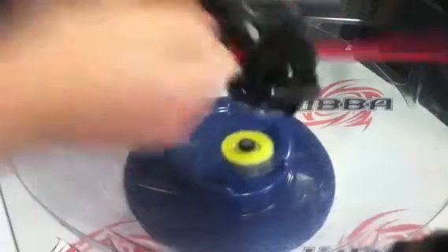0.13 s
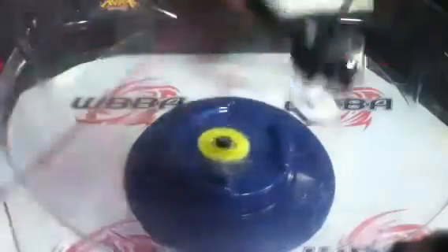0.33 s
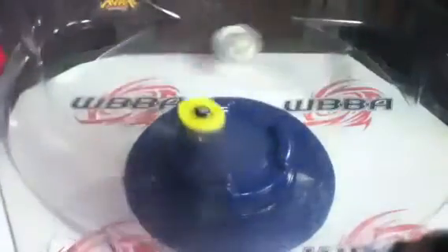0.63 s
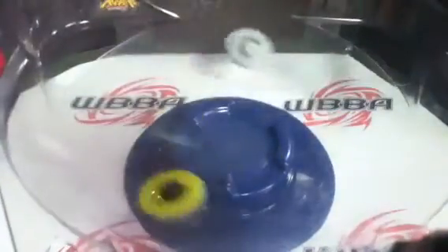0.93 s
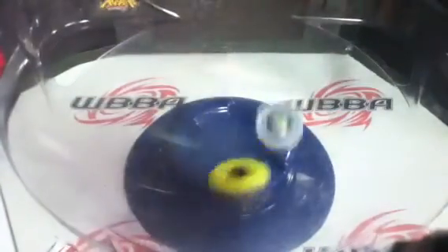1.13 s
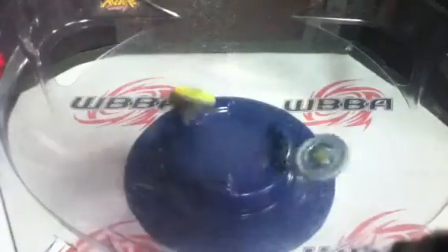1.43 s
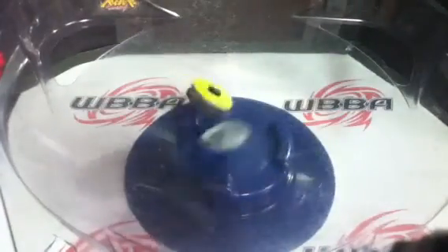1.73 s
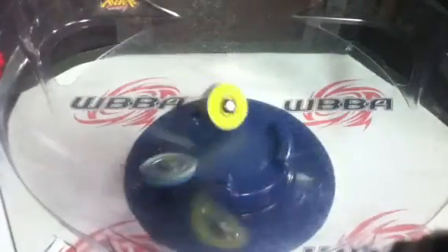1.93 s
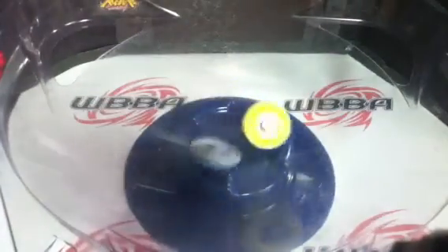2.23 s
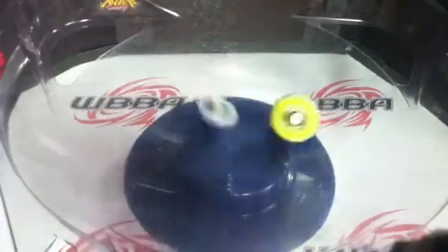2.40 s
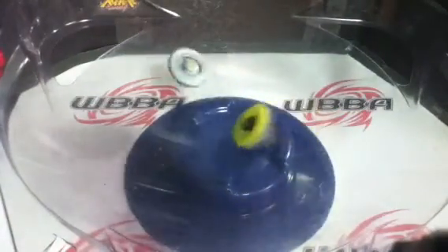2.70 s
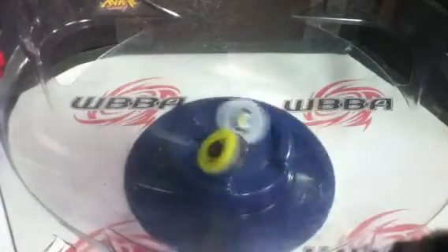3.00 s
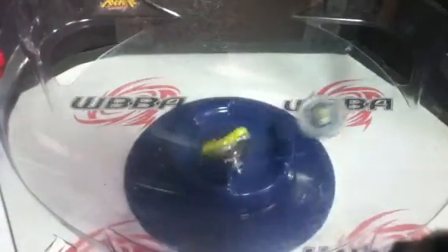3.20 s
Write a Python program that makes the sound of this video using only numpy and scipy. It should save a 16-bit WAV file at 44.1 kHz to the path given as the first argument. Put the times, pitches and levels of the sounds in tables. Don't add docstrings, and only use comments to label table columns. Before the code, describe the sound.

Metal spinning tops clash with bright cracks, then scrape and tick rapidly around a plastic bowl.

```python
import sys
import numpy as np
from scipy import signal
from scipy.fft import rfft, irfft
from scipy.io import wavfile
from scipy.ndimage import uniform_filter1d

SR = 44100
rng = np.random.default_rng(int(sys.argv[2]) if len(sys.argv) > 2 else 0)


def pcm_store(signal):
    levels = np.round(np.clip(np.atleast_2d(signal), -1, 1) * 32767)
    wavfile.write(sys.argv[1], SR, levels.astype(np.int16).T)


def attenuation_scalar(level_db):
    decades = np.asarray(level_db, float) / 20
    return 10 ** decades


N = 147735
T = np.arange(N) / SR
WOBBLE_DB, WOBBLE_PER_S = 1, 14


def noise():
    return rng.standard_normal(N)


def level(x, db):
    return x * attenuation_scalar(db) / np.sqrt(np.mean(x ** 2))


def cut(x, hz, kind="low"):
    return signal.sosfilt(signal.butter(2, hz, kind, fs=SR, output="sos"), x)


def band(x, hz, width_hz):
    return signal.lfilter(*signal.iirpeak(hz, hz / width_hz, fs=SR), x)


def walk(rate_hz):
    k = int(SR / rate_hz)
    steps = np.repeat(rng.standard_normal(N // k + 1), k)
    return 0.84 * uniform_filter1d(uniform_filter1d(steps, k), k)[:N]


def grit(spread_db, chatter_db, rate_hz):
    size_db = spread_db * np.minimum(rng.exponential(size=N), 5) + chatter_db * walk(rate_hz)
    return level(noise() * attenuation_scalar(size_db), 0)


def burst(start_s, hold_s, t60_s, rise_s):
    out = np.zeros(N)
    i = slice(int(start_s * SR) + 1, int((start_s + hold_s + 1.5 * t60_s) * SR))
    u = T[i] - start_s
    out[i] = np.clip(u / rise_s, 0, 1) * attenuation_scalar(-60 * np.clip(u - hold_s, 0, None) / t60_s)
    return out


def ring_modes(x, modes, loose_db):
    out = 0
    for k, (hz, width_hz, db) in enumerate(modes):
        drive = x * attenuation_scalar(loose_db * walk(WOBBLE_PER_S)) if loose_db else x
        out = out + (-1) ** k * attenuation_scalar(db) * band(drive, hz, width_hz)
    return out


def body(x, modes, loose_db=0):
    impulse_response = ring_modes(signal.unit_impulse(8192), modes, 0)
    return ring_modes(x, modes, loose_db) / np.sqrt(np.sum(impulse_response ** 2))


# hz, width_hz, level_db
BOWL_MODES = [(137.2, 17, 3), (285, 88, -3.5), (495, 92, 2), (672, 148, 0), (953, 168, -1.5),
              (1570, 596, -1), (2450, 3040, -7)]


def bowl(x):
    return cut(body(x, BOWL_MODES, WOBBLE_DB), 3270)


# hz, width_hz, level_db
METAL_MODES = [(3100, 363, 4.5), (3740, 477, 8), (3721, 568, 10.5), (4730, 820, 2), (5340, 313, 3),
               (7450, 3500, -10), (8400, 530, -4.5), (11100, 2800, -29), (14100, 1500, -27)]


def metal(x, loose_db=0):
    return body(x, METAL_MODES, loose_db)


# hz, width_hz, level_db
CRACK_MODES = [(2734, 2370, 11), (3300, 2660, 13), (4030, 324, 14.5), (6800, 4900, -4.5), (8400, 280, 9),
               (10100, 2200, -6.5), (14000, 3300, -52)]


def hard_contact(x):
    return body(x, CRACK_MODES)


# start_s, peak_db, ring_hz, ring_t60_s, ring_db
CLASHES = [(0.8585, -3.5, 5060, 0.038, -7.5), (0.8616, -5, 4306, 0.41, -13), (1.305, -5, 4200, 0.17, -13),
           (1.317, -11.5, 8400, 0.17, -18), (1.326, -15.5, 4320, 0.18, -11), (1.307, -6, 3280, 0.23, -8.5),
           (1.5949, -8, 3080, 0.05, -31), (1.8140, -1, 3080, 0.17, -14.5), (1.819, -5.5, 3620, 0.19, -16),
           (2.4103, -2, 4000, 0.16, -13), (2.4183, -6.5, 3980, 0.08, -29), (2.457, -10, 4540, 0.16, -22)]


def clashes():
    crack_s = 0.004
    crack, ring, knock = np.zeros(N), np.zeros(N), np.zeros(N)
    jangle, snap = grit(0.24, 0.76, 190), noise()
    for start_s, db, hz, t60_s, ring_db in CLASHES:
        blow = attenuation_scalar(db) * burst(start_s, 0.7 * crack_s, 0.92 * crack_s, 0.0011) * snap
        shake = attenuation_scalar(db + ring_db) * burst(start_s, 0.00082, t60_s, 0.00044) * jangle
        knock += blow
        crack += attenuation_scalar(-12) * blow + attenuation_scalar(-4.5) * shake
        ring += attenuation_scalar(17) * band(band(shake, hz, 147), hz, 640)
        ring += attenuation_scalar(9.5) * band(blow, hz, 400)
    return hard_contact(crack) + attenuation_scalar(-22.5) * bowl(knock) + ring


# start_s, peak_db, metal_share_db, bowl_pitch_hz
EARLY_SCRAPES = [(1.039, -24, -17, 550), (1.067, -18.5, -5, 520), (1.112, -16.5, -6.5, 940),
                 (1.18, -20, -12, 1080), (1.423, -10, -7, 976), (1.493, -7.5, -15, 495),
                 (1.512, -23, 1, 503), (1.531, -8, -7, 533), (1.548, -6.5, -0.5, 560),
                 (1.593, -8.5, 0, 495), (1.637, -5.5, -2.5, 600), (1.647, -4, -4, 495),
                 (1.677, -9, -3, 636), (1.716, -2, -12, 603), (1.733, -24.5, 14, 805),
                 (1.765, -6, -10, 544), (1.866, -15, 1, 950), (1.893, -18.5, -8, 930),
                 (1.92, -14.5, -18, 500), (1.969, -12.5, -23, 540), (2.021, -8, -17, 484),
                 (2.065, -13, -3.5, 505), (2.092, -13, 3, 634), (2.114, -6.5, -6, 587),
                 (2.13, -12.5, -5, 764)]
LATE_SCRAPES = [(2.198, -9.5, 0, 914), (2.242, -5.5, 2.5, 720), (2.294, -4.5, -7.5, 553),
                (2.311, -13, -1, 520), (2.349, -4.5, -8, 560), (2.379, -11, 5, 570), (2.471, -8, 2, 514),
                (2.521, -15.5, 5, 520), (2.558, -10.5, -11.5, 480), (2.605, -34, 16, 553),
                (2.661, -8.5, -33, 494), (2.702, -13.5, -13, 510), (2.748, -11.5, -7, 490),
                (2.834, -8.5, -1, 450), (2.857, -28.5, 17.5, 520), (2.939, -5.5, -1.5, 960),
                (2.979, -10, 0, 953), (3.013, -19.5, 8.5, 600), (3.047, -7.5, -8, 480),
                (3.071, -9, -5, 930), (3.14, -10, -15, 490), (3.163, -37, -17, 550),
                (3.205, -13.5, -3.5, 500), (3.333, -20, -26, 477)]


def rims():
    hold_s, t60_s, tick_s, tick_db = 0.0096, 0.076, 0.002, -16
    low, high, knock = np.zeros(N), np.zeros(N), np.zeros(N)
    rub = grit(2.3, 5.6, 150)
    for start_s, db, metal_db, hz in list(EARLY_SCRAPES) + list(LATE_SCRAPES):
        shape = attenuation_scalar(db - 18) * burst(start_s, hold_s, t60_s, 0.0045)
        shape += attenuation_scalar(db + tick_db) * burst(start_s, tick_s / 2, 2 * tick_s, 0.000097)
        low += shape
        high += attenuation_scalar(metal_db) * shape
        i = slice(int(start_s * SR), int((start_s + .25) * SR))
        force = (shape * rub)[i]
        force[0] += attenuation_scalar(db + 1.5)
        knock[i] += band(band(force, hz, 89), hz, 220)
    scrape = metal(high * grit(2.2, 1, 250), WOBBLE_DB)
    return attenuation_scalar(-0.5) * bowl(low * rub) + attenuation_scalar(18.5) * knock + scrape


# start_s, peak_db, ring_hz
TICKS = [(1.4222, -15, 3710), (1.4925, -25, 2770), (1.515, -14, 3140), (1.5312, -12, 3180),
         (1.5514, -8, 3100), (1.6376, -21, 3050), (1.6473, -18, 3950), (1.682, -15, 3100),
         (1.722, -4.5, 3010), (1.7304, -3.5, 3060), (1.7345, -11, 3080), (1.7694, -15, 3070),
         (1.9694, -26, 3400), (2.0308, -34, 2950), (2.0911, -12.5, 3650), (2.1166, -9, 3140),
         (2.2, -4.5, 2880), (2.2406, -4.5, 4840), (2.2504, -9, 4490), (2.2902, -2, 3400),
         (2.311, -12, 4630), (2.3516, -12, 3790), (2.3578, -3, 4900), (2.3834, -5.5, 4200),
         (2.4744, -7, 3100), (2.5197, -15, 3160), (2.606, -7.5, 4500), (2.6593, -14.5, 4100),
         (2.7107, -5.5, 4590), (2.7566, -32, 3380), (2.7574, -19, 3670), (2.7861, -15.5, 4230),
         (2.833, -11.5, 3100), (2.8382, -13, 3300), (2.938, -12, 3730), (2.9464, -28, 3890),
         (2.9816, -6, 2550), (3.0136, -12, 4090), (3.047, -16, 2700), (3.074, -10.5, 2950),
         (3.143, -28, 3960), (3.1634, -16, 4020), (3.203, -21, 3160), (3.2299, -18.5, 3220)]


def ticks():
    crack, ring, snap = np.zeros(N), np.zeros(N), grit(4.4, 1, 300)
    for start_s, db, hz in TICKS:
        i = slice(int(start_s * SR), int((start_s + .1) * SR))
        blow = (attenuation_scalar(db - 17.5) * burst(start_s, 0.00068, 0.01, .0003) * snap)[i]
        crack[i] += blow
        ring[i] += band(blow, hz, 150)
    return metal(crack) + attenuation_scalar(-14) * hard_contact(crack) + attenuation_scalar(25) * ring


# start_s, peak_db, gear_hz, housing_hz
TEETH = [(0.2301, -7.5, 4000, 1390), (0.2542, 2, 4100, 1570), (0.265, -8, 3640, 1610),
         (0.2771, 3, 4400, 1480), (0.2878, 0, 3630, 1835), (0.302, -12, 3770, 1510),
         (0.3167, -1.5, 2970, 1480), (0.3284, -1.5, 4460, 1560), (0.3368, -3, 3870, 1460),
         (0.3571, -3, 4350, 1900), (0.3649, -1, 3540, 1500), (0.377, -10.5, 3560, 1460),
         (0.392, -3, 3810, 1460), (0.4004, -7, 3370, 1220), (0.4074, -11, 3440, 1160),
         (0.4194, -5, 3400, 1207)]
# time_s, level_db
PULL = [
    (0.227, -32),
    (0.25, -25),
    (0.3, -17.5),
    (0.35, -15),
    (0.41, -10.5),
    (0.43, -17),
    (0.519, -30.5),
]
# hz, width_hz, level_db
LAUNCHER_MODES = [(1010, 240, -15.5), (1685, 370, -10.5), (2560, 800, -9.5), (3650, 440, 0.5),
                  (4460, 450, -3), (5370, 830, -8), (6660, 1350, -12), (9200, 2100, -15.5),
                  (13000, 2500, -39)]


def cord():
    tooth_s = 0.0041
    time_s, pull_db = np.array(PULL).T
    whir = attenuation_scalar(np.interp(T, time_s, pull_db - 3.5, left=-99, right=-99)) * grit(0.52, 3.7, 330)
    snaps, ring, snap = np.zeros(N), np.zeros(N), grit(1, 0.78, 550)
    for start_s, db, gear_hz, housing_hz in TEETH:
        blow = attenuation_scalar(db - 9.5) * burst(start_s, tooth_s / 2, 3.3 * tooth_s, 0.00059) * snap
        snaps += blow
        ring += attenuation_scalar(-3) * band(blow, gear_hz, 400)
        ring += attenuation_scalar(13.5) * band(band(blow, housing_hz, 88), housing_hz, 320)
    bump_hz = 61.5
    bump = burst(.245, 0.035, 0.15, 0.0085) * noise()
    bump = cut(cut(bump, bump_hz), 2 * bump_hz)
    return body(whir + snaps, LAUNCHER_MODES) + ring + bump


# start_s, peak_db, t60_s, top_hz, soft_push_db
THUDS = [
    (0.248, -33, 0.034, 393, -13),
    (0.455, -20, 0.19, 1050, -23),
    (0.562, -21.5, 0.069, 1480, -39),
    (0.925, -29.5, 0.098, 990, -51),
    (1.423, -21.5, 0.34, 440, -39),
    (1.875, -23.5, 0.32, 317, -24),
    (2.253, -47, 0.21, 300, -18.5),
    (2.451, -20, 0.18, 307, -33),
]


def thuds():
    push_s = 0.0047
    out, rattle = np.zeros(N), noise()
    for start_s, db, t60_s, top_hz, push_db in THUDS:
        force = attenuation_scalar(db) * burst(start_s, 0.005, t60_s, 0.001) * rattle
        force[int(start_s * SR)] += attenuation_scalar(db + 12.5)
        u = np.clip((T - start_s) / push_s, 0, 1)
        push = np.sin(2 * np.pi * u) * np.sin(np.pi * u)
        out += 2.54 * cut(cut(force, top_hz), top_hz) + attenuation_scalar(push_db) * push
    out = cut(out, 118, "high")
    return out + attenuation_scalar(-8.5) * bowl(out)


# time_s, bowl_db, rattle_rel_db
ROLL = [(0, -52.5, 3), (.1, -52.5, 5.5), (.22, -46, 2), (.44, -49, 18.5), (0.477, -29.5, -4.5),
        (.7, -36.5, -6), (.84, -42, -5), (1.1, -33.5, -8.5), (1.27, -43, -5), (1.45, -44, 11),
        (1.899, -35, -0.5), (2.05, -34.5, -7), (2.3, -28, 1), (2.6, -35.5, -3), (2.8, -31.5, -7.5),
        (2.9, -33, 1.5), (3.1, -31, -3), (3.28, -41.5, -4.5)]


def tips():
    hop_s, hop_db = 0.017, -2
    time_s, bowl_db, rattle_db = np.array(ROLL).T
    lifted = np.zeros(N)
    for hit in list(EARLY_SCRAPES) + list(LATE_SCRAPES):
        lifted[(T > hit[0] - hop_s) & (T < hit[0])] = 1
    lift_db = hop_db * uniform_filter1d(lifted, size=200)
    low = attenuation_scalar(np.interp(T, time_s, bowl_db + 1.5) + lift_db)
    high = attenuation_scalar(np.interp(T, time_s, bowl_db + rattle_db + 1) + lift_db)
    hum_hz = 143.3
    hum = level(band(band(noise(), hum_hz, 13), hum_hz, 43), -57) * attenuation_scalar(11 * walk(9))
    air = attenuation_scalar(-14) * high * band(noise(), 8500, 5600)
    rumble = bowl(low * grit(3.2, 5, 60))
    rattle = metal(high * grit(0.45, 4.4, 82), WOBBLE_DB)
    return rumble + rattle + hum + air


def room(near):
    t60_s, tail_db, top_hz, low_hz = 0.22, -12.5, 8200, 440
    tail = noise() * burst(0.008, .002, t60_s, 0.0024)
    tail = cut(cut(tail, top_hz), low_hz, "high")
    return attenuation_scalar(tail_db) * signal.fftconvolve(near, tail / np.sqrt(np.sum(tail ** 2)))[:N]


# hz, density_db
FLOOR_SPECTRUM = [(15, -30), (30, -10), (145, 13), (734, -3), (936, -12), (1790, 0), (2550, -118),
                  (3160, 11.5), (16000, -64)]


def floor():
    hz, db = np.array(FLOOR_SPECTRUM).T
    log_hz = np.log(np.arange(N // 2 + 1) * SR / N + 1)
    return level(irfft(rfft(noise()) * attenuation_scalar(np.interp(log_hz, np.log(hz), db)), N), -45.5)


def scene():
    near = clashes() + rims() + ticks() + cord() + thuds() + tips()
    return (near + room(near) + floor())[None]


def top_cut(x):
    return signal.sosfilt(signal.butter(12, 16520, fs=SR, output="sos"), x)


HUSH_AT_S = [.8585, 1.3035, 1.8125]


def record(dry):
    low_cut_hz, top_hz, hush_s, hush_above_hz, ceiling = 69, 11300, .009, 2300, .68
    x = cut(cut(dry, low_cut_hz, "high"), top_hz)
    hush = sum((T > s - hush_s) & (T < s - .001) for s in HUSH_AT_S)
    low = signal.sosfiltfilt(signal.butter(3, hush_above_hz, fs=SR, output="sos"), x)
    x = x - (x - low) * uniform_filter1d(1. * hush, size=40)
    x = x / (1 + np.abs(x / ceiling) ** 4) ** (1 / 4)
    x = signal.sosfilt(signal.ellip(8, .2, 60, 15800, fs=SR, output="sos"), x)
    return top_cut(x)


dry = scene()
out = record(dry)
pcm_store(out)
```